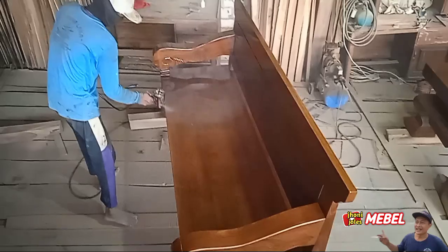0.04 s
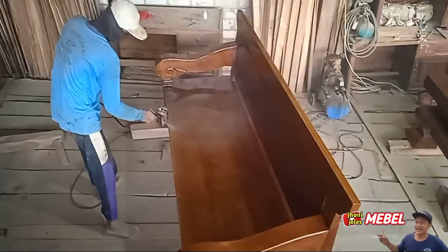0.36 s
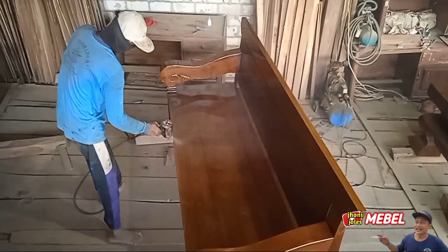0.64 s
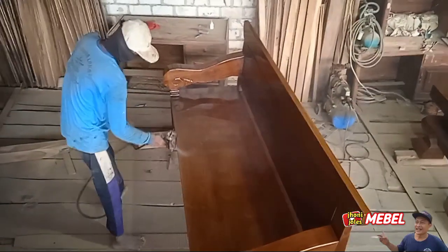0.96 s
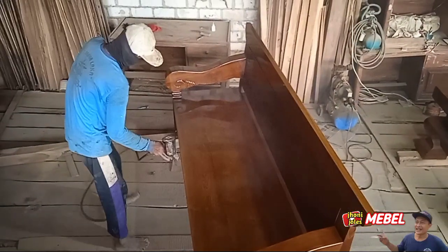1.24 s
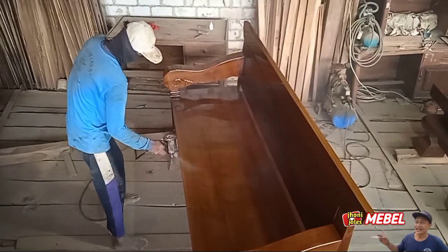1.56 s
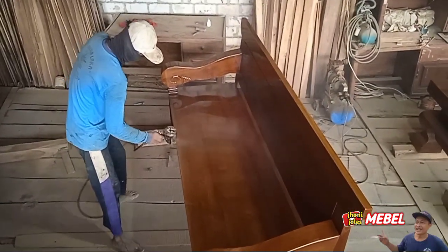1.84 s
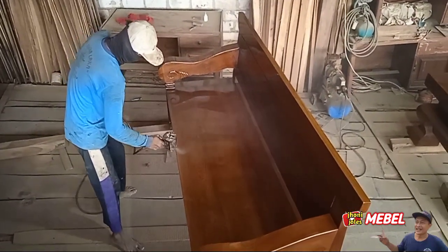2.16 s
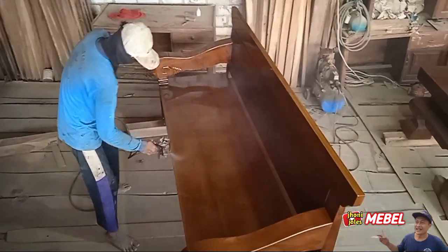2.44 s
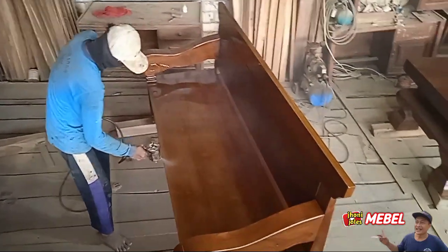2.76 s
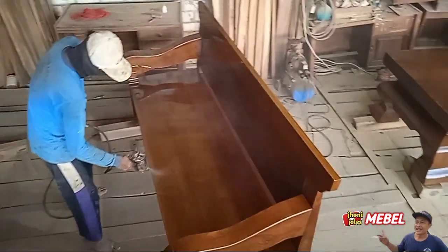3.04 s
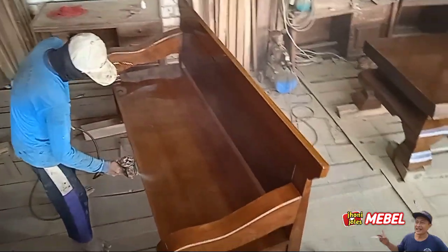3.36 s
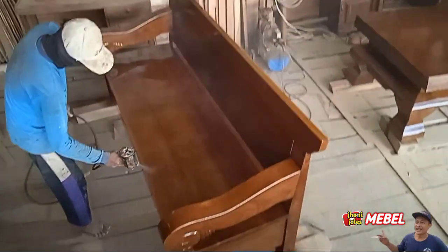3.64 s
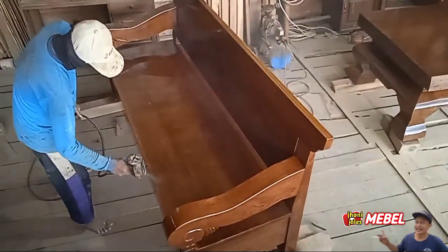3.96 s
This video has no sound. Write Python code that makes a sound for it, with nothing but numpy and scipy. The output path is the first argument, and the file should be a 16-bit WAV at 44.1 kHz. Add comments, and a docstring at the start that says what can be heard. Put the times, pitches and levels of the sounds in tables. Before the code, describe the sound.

A spray gun hisses without a break, with thin air whistles flaring and fading in the jet. A small air compressor runs alongside it in a wooden workshop, with a fast hollow knocking, light metallic clatter and low drone.

```python
"""A small piston compressor runs steadily in a wooden workshop, feeding a spray gun at a bench.
Each turn of the crank gives a hollow knock, a metallic clatter and a puff of intake air,
about 44 times a second, over a low drone smeared by the room. The gun's turbulent jet hisses
throughout and rings narrow resonances: thin air whistles that flare and fade."""
import sys
import numpy as np
from scipy import signal
from scipy.fft import rfft, irfft
from scipy.io import wavfile
from scipy.ndimage import uniform_filter1d

SR = 44100
rng = np.random.default_rng(int(sys.argv[2]) if len(sys.argv) > 2 else 0)


def dump_mix(stems):
    """Bounce the given channels to the path in sys.argv[1] as a 16-bit WAV at rate SR."""
    frames = np.atleast_2d(stems).T  # one column per channel
    limited = np.clip(frames, -1, 1)  # hard clip at full scale
    pcm = np.round(limited * 32767).astype(np.int16)
    wavfile.write(sys.argv[1], SR, pcm)


N = 176400

# crank speed: time_s, turns_per_s
CRANK_SPEED = [(0, 43.85), (1.2, 43.855), (1.6, 43.8), (2.2, 43.84), (2.6, 43.835), (2.85, 43.79),
               (3.3, 43.84), (4, 43.85)]
# hollow body of the knock: crank_multiple, relative_db
KNOCK_PARTIALS = [(12, -28), (13, -22.5), (14, -20), (15, -15.5), (16, -9), (17, 1), (18, 4), (19, -4.5),
                  (20, 2), (21, 3.5), (22, -16), (23, -18.5), (24, -21.5)]
# fader ride on the knock: time_s, level_db
KNOCK_FADER = [(0, -47), (.4, -46), (.8, -45), (1.3, -45), (2, -45.5), (2.7, -46.5), (3.3, -46), (4, -46.5)]
# rattle of valves and casing: pitch_hz, level_db per crank multiple
CLATTER_SPECTRUM = [(1080, -72), (1400, -70.5), (1850, -67), (2400, -66), (2900, -68), (3500, -73.5),
                    (4200, -74.5), (5200, -76)]
# casing tones that swell out of the clatter: peak_s, half_length_s, pitch_hz, level_db
CASING_TONES = [(.15, .25, 2017, -57), (.25, .8, 1184, -58), (.55, .5, 2280, -58.5),
                (1.2, 1.6, 1534, -59.5), (1.3, .6, 1841, -62), (1.4, .5, 2104, -61), (1.7, 1.9, 2411, -62),
                (1.8, .8, 1797, -58), (1.9, .9, 3858, -65), (2.3, .5, 2017, -61), (3.2, .3, 1797, -58),
                (3.2, .25, 2674, -59), (3.25, .2, 3858, -63), (3.25, .3, 1929, -61), (3.4, .9, 1271, -60),
                (3.7, .35, 1140, -59), (3.7, .25, 2017, -57), (3.9, .4, 1227, -60)]
# drone of the crank and valves: crank_multiple, relative_db
HUM_PARTIALS = [(1, -30), (2, -4), (3, -15), (4, -13), (5, -7), (6, -8), (7, 0), (8, -3), (9, -6),
                (10, -14), (11, -15)]
# air drawn into the compressor: frequency_hz, density_db
INTAKE_SPECTRUM = [(25, -118), (48, -114), (66, -92), (150, -97), (300, -85), (420, -90.5), (540, -95),
                   (640, -88.5), (740, -80), (900, -78), (1000, -91), (1500, -103), (4000, -131)]
# hiss of the gun's jet: frequency_hz, density_db
JET_SPECTRUM = [(300, -115), (900, -93.5), (1120, -82), (1350, -85), (2000, -81.5), (2550, -83),
                (3100, -88.5), (3450, -83.5), (4100, -89), (4600, -86.5), (5000, -83.5), (5350, -88.5),
                (5750, -91.5), (6600, -101), (7700, -113), (8400, -114), (9200, -107), (11000, -106),
                (12800, -105), (13900, -109), (14300, -103), (15200, -99), (16000, -103)]
# the five whistles, lowest first: pitch_hz
WHISTLE_PITCHES = [2759, 4808, 5222, 5497, 10000]
# their voicing, in the same order: width_hz, trim_db, steadiness
WHISTLE_VOICES = [(49.6, 0, 0.4), (110, 0.5, 0.26), (32, -2.5, 0.2), (42.3, -2, 0.45), (260, 3, 0.06)]
# their fader rides, in the same order, ahead of the trim: time_s, level_db
LOW_FADER = [(0.0, -63), (0.31, -50), (0.34, -62), (0.42, -50), (0.46, -64), (0.5, -49), (0.66, -59),
             (0.81, -48), (0.92, -66), (1.1, -64), (1.12, -49), (1.18, -64), (1.24, -49), (1.3, -56),
             (1.51, -51), (1.55, -58), (1.77, -53), (1.83, -65), (1.96, -49), (1.99, -59), (2.27, -54),
             (2.31, -59), (2.47, -47.5), (2.57, -57), (3.32, -61), (3.42, -65), (3.58, -56), (3.6, -68),
             (3.62, -48), (3.85, -48), (3.9, -56), (4.0, -54)]
MID_FADER = [(0, -65), (.42, -62), (.58, -55), (.65, -51.5), (.79, -51), (.83, -62), (1.05, -51),
             (1.25, -58), (1.36, -51.5), (1.7, -55), (2.35, -62), (2.9, -56.5), (3.25, -49), (3.45, -54),
             (3.54, -56), (3.585, -47), (3.62, -52), (3.7, -59), (3.74, -45), (3.77, -58), (3.88, -50.5),
             (4, -58)]
HIGH_FADER = [(0.0, -68), (0.04, -54.5), (0.17, -62), (0.33, -47.5), (0.36, -53.5), (0.93, -59.5),
              (1.54, -58), (2.38, -60.5), (2.85, -50), (2.9, -59), (3.66, -50), (4.0, -66)]
UPPER_FADER = [(0.0, -62), (0.82, -59), (0.99, -76), (1.87, -61), (1.93, -71), (2.72, -62), (2.75, -53),
               (2.9, -64), (3.29, -50.5), (3.32, -66), (3.79, -59), (3.82, -50), (3.92, -61), (4.0, -54)]
TOP_FADER = [(0.0, -75), (0.14, -64.5), (0.32, -76), (0.59, -67), (0.71, -72), (0.82, -69.5), (1.01, -77),
             (1.06, -68.5), (1.26, -76.5), (1.88, -68.5), (1.94, -82), (2.04, -66.5), (2.16, -73),
             (2.22, -63), (2.28, -74), (2.92, -69.5), (2.95, -78), (3.05, -68.5), (3.83, -71.5), (4.0, -64)]
# breathy overtone of the nozzle: pitch_hz, width_hz, level_db, steadiness (clipped to 0-1)
NOZZLE_OVERTONE = (5010, 112, -60.5, -9)

DRIFT_HZ = .7  # how fast the compressor's partials wander


def knock(turns):
    """One hollow knock a turn: a sudden attack, then a beating ring until the next."""
    multiples, db = np.transpose(KNOCK_PARTIALS)
    log_gain = np.log(amp(np.interp(abs(np.fft.fftfreq(128, 1 / 128)), multiples, db)))
    # minimum phase packs the energy into the attack
    lags = np.imag(signal.hilbert(log_gain))[np.round(multiples).astype(int)]
    ring = partials(turns, KNOCK_PARTIALS, lags, drift=.16)
    unevenness = 1 + .045 * wander(10)
    return amp(over_time(KNOCK_FADER)) * ring * unevenness


def clatter(turns, crank_hz):
    """Valves and casing rattle each turn; tones swell and fade as the listener moves through the room."""
    t, out = np.arange(N) / SR, np.zeros(N)
    drift_depth = .6
    for multiple in range(25, 118):
        bed = amp(over_pitch(CLATTER_SPECTRUM, multiple * crank_hz)) / np.sqrt(1 + 2 * drift_depth ** 2)
        # each casing tone snaps to the nearest crank multiple
        swell_power = sum(amp(db) ** 2 * np.exp(-((t - peak_s) / half_s) ** 2)
                          for peak_s, half_s, hz, db in CASING_TONES if round(hz / crank_hz) == multiple)
        strength = np.sqrt(np.maximum(bed ** 2, swell_power))
        phase = 2 * np.pi * ((multiple * turns + rng.random()) % 1)
        drift = bed * drift_depth
        out += (strength + drift * wander(DRIFT_HZ)) * np.cos(phase)
        out += drift * wander(DRIFT_HZ) * np.sin(phase)
    return np.sqrt(2) * out * stroke(turns, depth=.25)


def hum(turns):
    """The crank's low drone, smeared over the whole turn by the room; its upper part slowly grows."""
    multiples = np.transpose(HUM_PARTIALS)[0]
    smear_rad, lag_turns = 1.22 * multiples ** 2, .098
    drone = amp(-58) * partials(turns - lag_turns, HUM_PARTIALS, smear_rad, drift=.28)
    upper = signal.sosfiltfilt(signal.butter(6, 356, "high", fs=SR, output="sos"), drone)
    return drone + upper * (crescendo(db_per_s=2) - 1)


def intake(turns):
    """Air rushes into the compressor with a soft puff on every turn."""
    return air(INTAKE_SPECTRUM, patchy_db=1) * stroke(turns, depth=.1)


def spray_gun(turns):
    """The jet's fluttering hiss and its whistles, all pulsing a little with the pump."""
    hiss = air(JET_SPECTRUM, patchy_db=2) * crescendo(db_per_s=.22)
    flutter = amp(.76 * wander(18))
    faders = LOW_FADER, MID_FADER, HIGH_FADER, UPPER_FADER, TOP_FADER
    whistles = sum(amp(over_time(fader)) * whistle(hz, *voice)
                   for fader, hz, voice in zip(faders, WHISTLE_PITCHES, WHISTLE_VOICES))
    return (hiss * flutter + whistles + whistle(*NOZZLE_OVERTONE)) * stroke(turns, depth=.068)


def whistle(pitch_hz, width_hz, db, steadiness):
    """Turbulence rings a narrow resonance; a steady whistle partly holds its own strength."""
    offset_hz = np.fft.fftfreq(N, 1 / SR)
    turbulence = rng.standard_normal(N) + 1j * rng.standard_normal(N)
    ring = unit_rms(np.fft.ifft(turbulence / (1 + (offset_hz / (.6 * width_hz)) ** 2)))
    ring = unit_rms(ring / (abs(ring) + .75) ** np.clip(steadiness, 0, 1))
    return np.sqrt(2) * amp(db) * np.real(ring * np.exp(2j * np.pi * pitch_hz * np.arange(N) / SR))


def air(spectrum, patchy_db):
    """Turbulent noise of a given colour, with short random patches of strength."""
    hz, _, bands = signal.stft(rng.standard_normal(N), SR, nperseg=1024, noverlap=768)
    patches = uniform_filter1d(rng.standard_normal(bands.shape), size=7, axis=0)
    patches = unit_rms(uniform_filter1d(patches, size=12, axis=1))
    bands = bands * amp(over_pitch(spectrum, hz)[:, None] + patchy_db * patches)
    return np.sqrt(SR / 2) * signal.istft(bands, nperseg=1024, noverlap=768)[1][:N]


def partials(turns, rows, lags, drift):
    """A stack of crank harmonics at rms 1, each with its own phase lag and slow drift."""
    stack = np.zeros(N)
    for (multiple, db), lag in zip(rows, lags):
        wobble = 1 + drift * (wander(DRIFT_HZ) + 1j * wander(DRIFT_HZ)) / 2
        phase = 2 * np.pi * round(multiple) * turns - lag
        stack += amp(db) * np.real(wobble * np.exp(1j * phase))
    return unit_rms(stack)


def stroke(turns, depth):
    """The pump's tremolo, peaking just after each knock."""
    return 1 + depth * np.cos(2 * np.pi * (turns - .15))


def crescendo(db_per_s):
    """A steady fade up, passing unity gain halfway through."""
    return amp(db_per_s * (np.arange(N) - N / 2) / SR)


def wander(rate_hz):
    """Slow random modulation of rms near 1, up to about the given rate."""
    size = 2048
    hz = np.fft.rfftfreq(size, 2 * N / SR / size)
    slow = irfft(rfft(rng.standard_normal(size)) * np.exp(-.5 * (hz / rate_hz) ** 2))
    return np.interp(np.arange(N) * size / (2 * N), np.arange(size), unit_rms(slow))


def over_time(points):
    """An automation curve of (time_s, value) at every sample."""
    return np.interp(np.arange(N) / SR, *np.transpose(points))


def over_pitch(points, hz):
    """An EQ curve of (frequency_hz, level_db) read on a log axis."""
    point_hz, db = np.transpose(points)
    return np.interp(np.log(hz + 1), np.log(point_hz + 1), db)


def amp(db):
    """Decibels to gain."""
    return 10 ** (np.asarray(db) / 20)


def unit_rms(x):
    """Scales to rms 1."""
    return x / np.sqrt(np.mean(abs(x) ** 2) + 1e-20)


def scene():
    """Compressor and spray gun in mono, every layer locked to the crank."""
    crank_hz, first_knock_s = over_time(CRANK_SPEED), .0195
    turns = np.cumsum(crank_hz) / SR - first_knock_s * crank_hz[0]
    compressor = intake(turns) + hum(turns) + knock(turns) + clatter(turns, crank_hz.mean())
    return (compressor + spray_gun(turns))[None]


def record(dry):
    """A steep high cut takes the very top off the mix."""
    high_cut = signal.firwin(1023, cutoff=15780, window=("kaiser", 9), fs=SR)
    return signal.oaconvolve(dry, high_cut[None], "same")


dry = scene()
out = record(dry)
dump_mix(out)
```